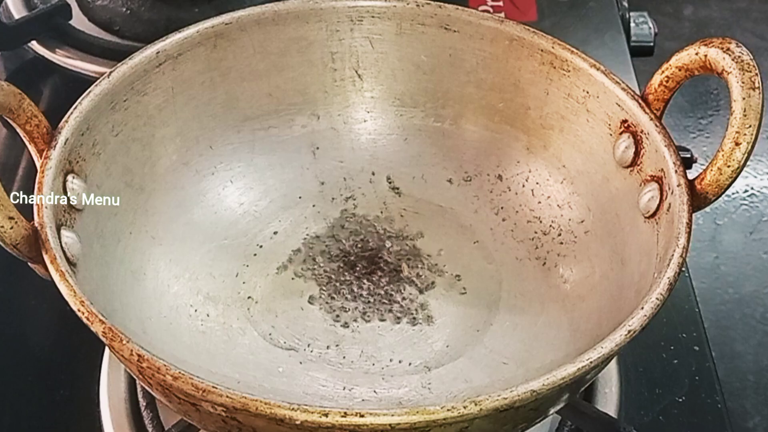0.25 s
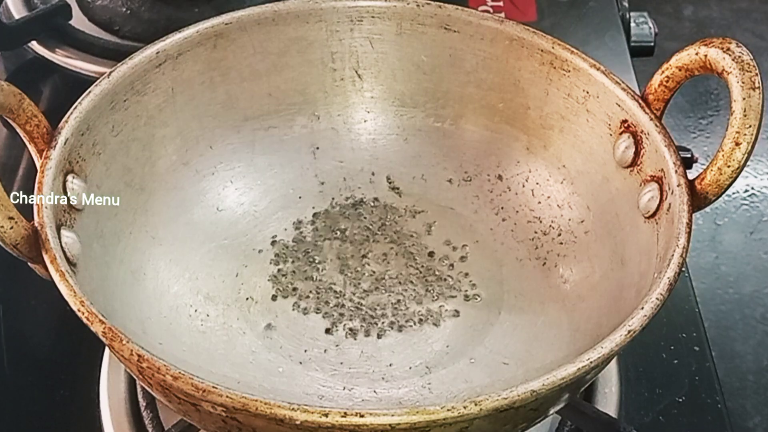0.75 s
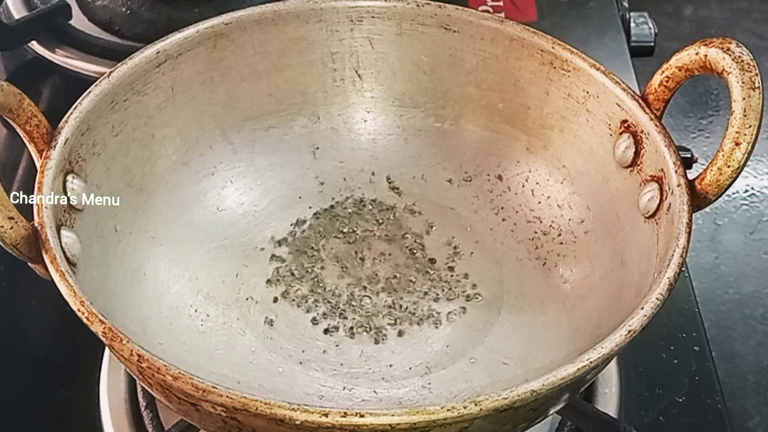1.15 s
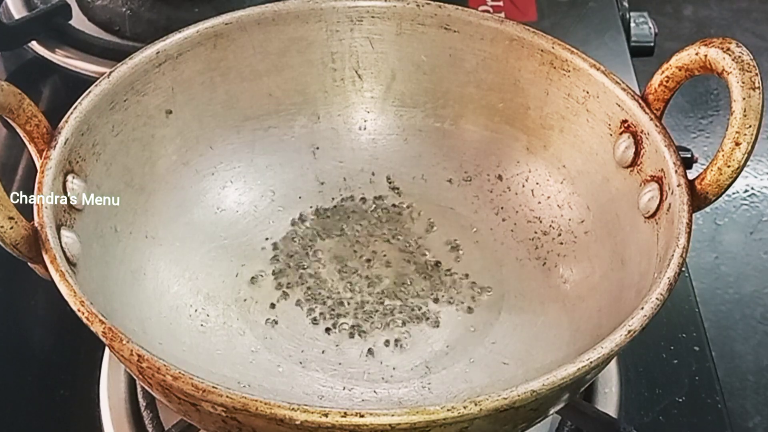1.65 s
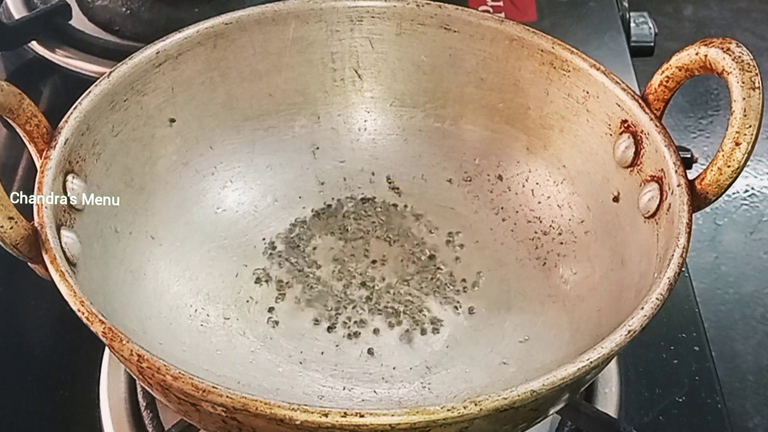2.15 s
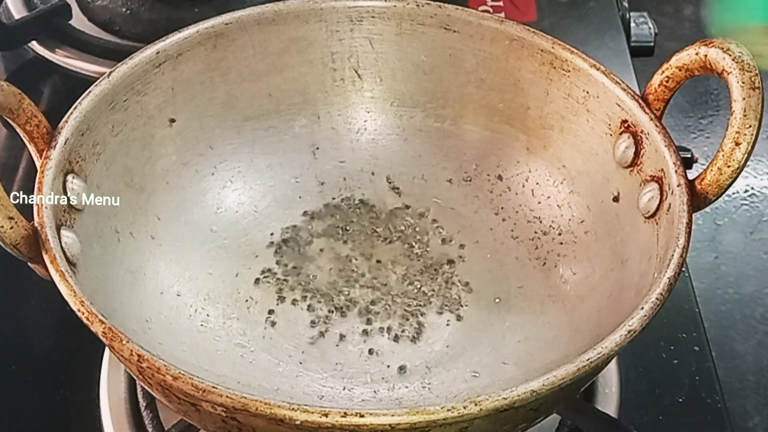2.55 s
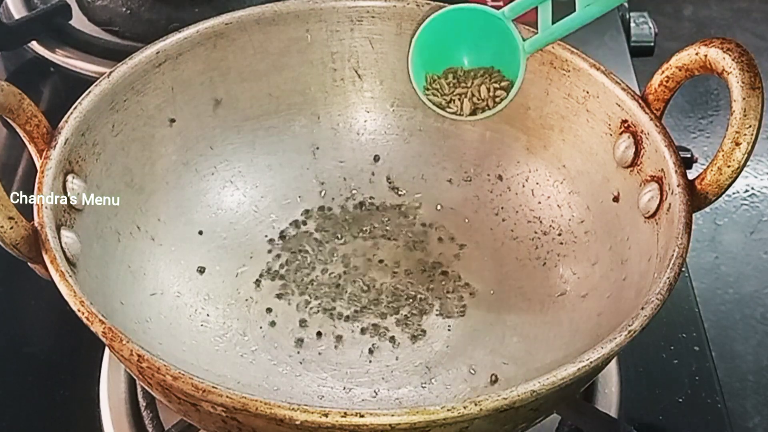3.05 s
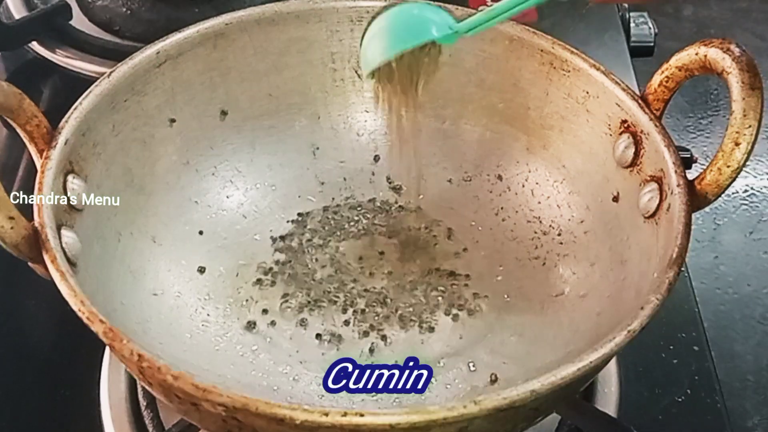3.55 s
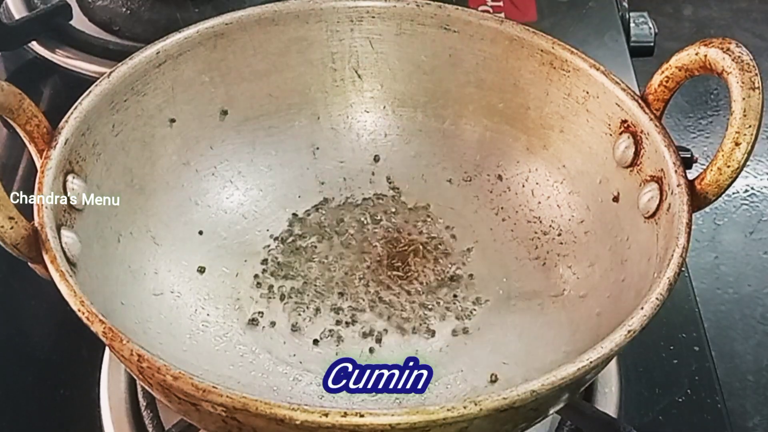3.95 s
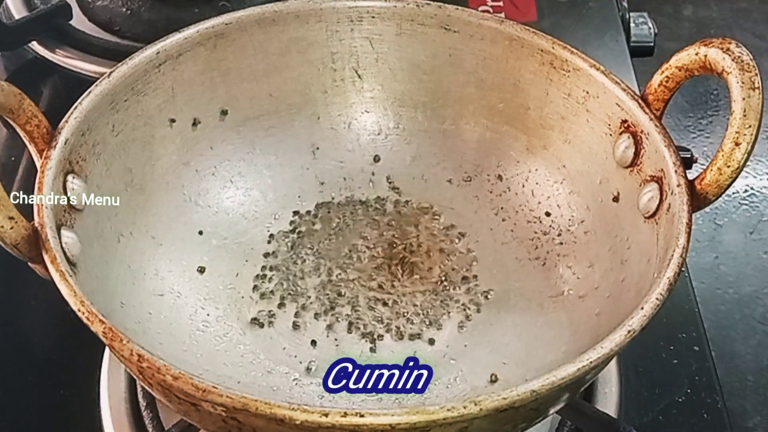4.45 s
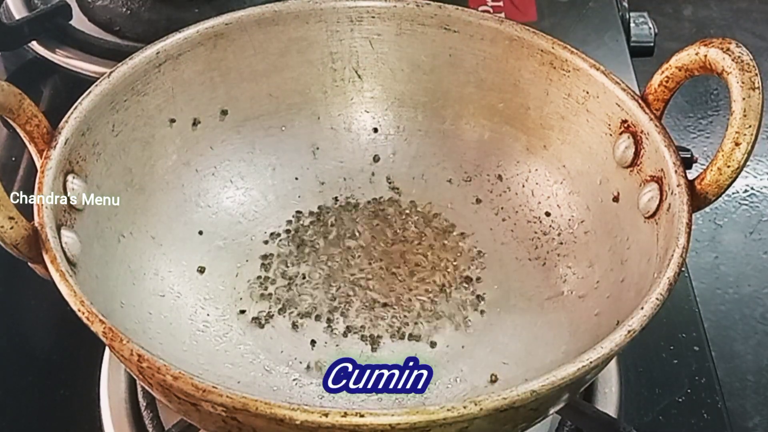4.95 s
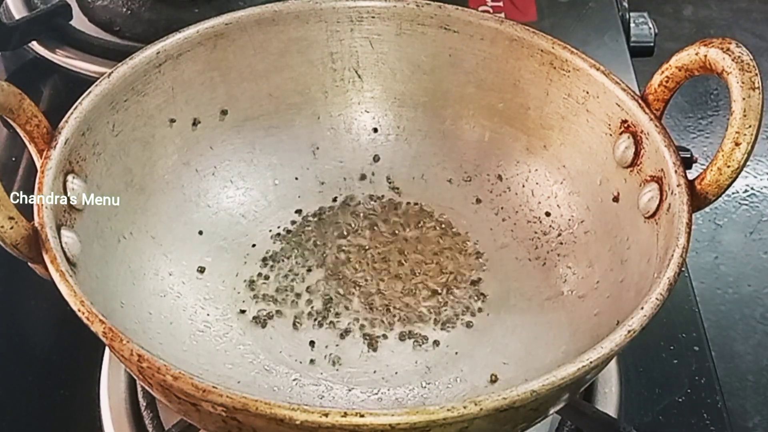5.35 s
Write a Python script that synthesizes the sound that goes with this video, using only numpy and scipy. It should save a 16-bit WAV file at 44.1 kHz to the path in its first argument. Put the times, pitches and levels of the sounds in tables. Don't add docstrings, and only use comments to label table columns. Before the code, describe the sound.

Close to a metal pan on a stove, mustard-like seeds burst in oil: isolated light ticks within the first second, frequent crisp cracks by two seconds, dense crackling after three. Brief steam hisses and dry spatter fill the gaps. A distant dish knock opens the scene and a few metallic knocks recur later. Small reflective kitchen, faint low hum, no speech.

```python
import sys
import numpy as np
from scipy import signal
from scipy.fft import rfft, irfft
from scipy.io import wavfile
from scipy.ndimage import uniform_filter1d

SR = 44100
rng = np.random.default_rng(int(sys.argv[2]) if len(sys.argv) > 2 else 0)


def voltage_ratio(decibels):
    exponent = np.asarray(decibels, float) / 20
    return 10 ** exponent


def pcm_store(signal):
    levels = np.round(np.clip(np.atleast_2d(signal), -1, 1) * 32767)
    wavfile.write(sys.argv[1], SR, levels.astype(np.int16).T)


N = 246519

# (pitch_hz, bright snap in dB against the peak)
DULL, LOW, MID, UPPER, HIGH = (2690, -0.5), (3780, -4), (5920, -4.5), (6780, -2.2), (9460, -2.8)
# (start_s, peak_db, body_db against peak, wash_db of steam and echo
# against peak, snap_db against its kind)
DULL_POPS = [
    (0.4826, -44, -1, -5.5, -20),
    (0.5707, -37.5, -28, -7, 10.5),
    (1.5548, -46.5, -6, -26, 18),
    (3.3823, -35, -9, -25, 0),
    (4.5779, -27.5, -12.5, -5, 3.5),
    (4.78, -39, 3.5, -9, 5),
    (5.4473, -20, -3.5, -18, -15),
]
LOW_POPS = [(0.2932, -37.5, -8.5, 1.5, -16), (1.1657, -19.5, -11, -11.5, 0), (1.277, -36, -6.5, -5.5, 0.5),
            (2.458, -25, -8.5, -12.5, -16), (2.6583, -26, -4.5, -22, -8), (2.9313, -25, -9, -2.5, -1.5),
            (3.04, -28, -7, -21.5, 3), (3.1562, -28, -16, -2.5, 1.5), (3.2491, -19, -40, -13, -2.5),
            (3.56, -21.5, -14.5, -9.5, -2), (3.7435, -22, -14, -10, -24), (3.7838, -23, -12, 1.5, -1),
            (4.2934, -22.5, -7, -11.5, -26), (4.4645, -28, -5, -16, 2), (4.5544, -16.5, -17, -17.5, -6),
            (4.809, -21.5, -9.5, -22, -10), (5.1773, -29.5, 0, -5, -4), (5.375, -28.5, -3.5, -10, -3)]
MID_POPS = [(1.5914, -22, -11.5, -18, 2), (1.881, -23.5, -16, -6.5, 1.5), (1.972, -21, -16.5, -9.5, -0.5),
            (2.117, -28, -44, -12, -1), (2.3246, -20, -13.5, -10.5, 0.5), (3.2767, -22.5, -7.5, -8, -1),
            (3.417, -27, -11.5, -5.5, -4), (3.678, -26, -12, -5, 2), (3.958, -25, -32, -4, -1),
            (4.0068, -20.5, -14.5, -13, -4), (4.0906, -20.5, -16, -11.5, -4), (4.1198, -24.5, -9.5, -6, -2),
            (4.65, -28.5, -19.5, -10, 5), (4.758, -40, -1, -3.5, 1), (4.772, -22, -16, -39, -4),
            (4.795, -25.5, -19, -2, 0.5), (4.838, -19, -14, -23, 0), (5.028, -22, -13, -11.5, -1.5),
            (5.539, -23.5, -21, -4.5, -5)]
UPPER_POPS = [(1.4656, -29, -11, -8.5, -2), (1.6511, -27, -6, -11.5, 3), (1.8317, -26.5, -14, -10.5, 1),
              (2.1938, -33.5, -2, -30, 4), (2.2881, -20, -17.5, -10.5, -1.5),
              (2.4263, -21.5, -10.5, -13.5, 0.5), (2.5903, -24.5, -8.5, -3.5, -5),
              (2.7914, -19, -18, -12, -0.5), (3.1446, -22, -22, -25, -3.5), (3.4437, -19.5, -14.5, -11, -7),
              (3.4978, -25.5, -13.5, -1.5, -2), (3.9065, -22.5, -6, -17, 1), (4.3406, -26, -17, -9, 0),
              (4.3719, -26.5, -9.5, -5.5, 0), (4.6299, -23, -54.5, -11, -2.5),
              (4.9375, -27.5, -6.5, -20, 2), (5.1672, -25, -12, -12, 3), (5.2436, -22, -11.5, -10.5, -0.5),
              (5.3825, -25.5, -13, -10, -1)]
HIGH_POPS = [(0.508, -32, -3, -24, -2), (0.728, -27, -10.5, -18.5, 2), (0.928, -21, -15.5, -7.5, -1),
             (1.076, -21.5, -13.5, -16, 0), (1.429, -20, -13.5, -15, 0.5), (1.4946, -22.5, -10, -16, 1.5),
             (2.1082, -27.5, -9, -9, 0), (2.1746, -22.5, -13.5, -7.5, 0), (2.355, -29.5, -35.5, -4, -3),
             (2.5681, -17, -12, -14, 2), (2.631, -18, -14.5, -12, -3), (2.6963, -25.5, -6, -14.5, 2),
             (2.7462, -28.5, -11, -11, 2.5), (3.0061, -20, -9.5, -14.5, -0.5),
             (3.0688, -31.5, -15.5, 2, -2), (3.2292, -25, -13.5, -7, -0.5), (3.316, -24, -8, -12.5, -2),
             (3.436, -24, -33, -23, -1), (3.6023, -28, -16, -10.5, -1), (3.694, -23, -33.5, -12.5, 4),
             (3.9656, -23, -12, -9.5, 0), (4.101, -22, -24, -25, 0), (4.1412, -15.5, -8.5, -16.5, -1),
             (4.164, -20.5, -31, -26, -2), (4.2353, -25.5, -13.5, -15, 0), (4.6948, -26, -13, -10, 3),
             (4.868, -28, -12, -5.5, 0), (4.9557, -19.5, -17, -11.5, -5), (5.1175, -26, -5, -13.5, 2.5),
             (5.4882, -18, -18.5, -10, -3)]
# (start_s, peak_db)
LOW_TICKS = [(1.548, -30), (1.7639, -40), (2.399, -49.5), (2.61, -28.5), (2.409, -40), (3.1386, -33.5),
             (3.4256, -31), (3.8008, -18.5), (3.8355, -29.5), (3.8477, -25), (3.898, -27.5), (3.9369, -31),
             (4.39, -49.5), (4.6223, -30.5), (4.846, -25.5), (5.3398, -38.5), (5.4432, -26), (5.4636, -31)]
MID_TICKS = [(0.277, -41), (0.554, -41), (1.5365, -40.5), (1.844, -34), (2.597, -28), (2.8523, -33.5),
             (2.861, -38), (2.9755, -31.5), (2.989, -35), (3.1502, -25.5), (3.3274, -25), (3.496, -29),
             (3.5208, -21), (3.6273, -31), (3.807, -28), (4.285, -30), (4.3509, -27), (4.3042, -25.5),
             (5.005, -29.5), (5.2774, -32.5)]
HIGH_TICKS = [(0.7364, -32.5), (0.893, -40), (0.913, -44), (1.0682, -29), (1.562, -31.5), (1.6732, -24.5),
              (1.8762, -25.5), (2.205, -32), (2.219, -24), (2.248, -29), (2.4856, -36), (2.5185, -27),
              (2.5335, -24.5), (2.5405, -45), (2.601, -27), (3.0418, -23.5), (3.3795, -28.5),
              (3.455, -24.5), (3.7547, -23), (4.0169, -19.5), (4.183, -25), (4.2424, -37), (4.3265, -24),
              (5.0586, -29), (5.1538, -37), (5.251, -45), (5.2953, -26), (5.4082, -27.5), (5.5126, -24.5),
              (5.53, -27)]
TICK_BODY_DB, TICK_WASH_DB = -17.5, -14.5


def bursts():
    rows = []
    pop_kinds = [(DULL, DULL_POPS), (LOW, LOW_POPS), (MID, MID_POPS), (UPPER, UPPER_POPS), (HIGH, HIGH_POPS)]
    for (hz, snap_db), pops in pop_kinds:
        for s, db, body_db, wash_db, *own_db in pops:
            rows.append((s, db, hz, body_db, snap_db + sum(own_db), wash_db))
    for (hz, snap_db), ticks in [(LOW, LOW_TICKS), (MID, MID_TICKS), (HIGH, HIGH_TICKS)]:
        rows += [(s, db, hz, TICK_BODY_DB, snap_db, TICK_WASH_DB) for s, db in ticks]
    return np.transpose(rows)


RING_STRAY = 0.02
STRONG_SNAP_DB = -27
BOWL_ECHO_S, BOWL_ECHO_DB = 0.0075, -12


def cracks(seeds, ring_cycles=24.0, split_t60=0.0015, bowl_t60=0.023, bowl_db=-8.5, spit_db=0.0):
    s, db, hz, body_db, snap_db, wash_db = seeds[:, :, None]
    hz = hz * (1 + RING_STRAY * rng.standard_normal(hz.shape))
    size = 1200
    t, out = np.arange(size) / SR, np.zeros(N + size)
    noise = rng.standard_normal((len(s), size))
    spit = noise * (voltage_ratio(-60 * t / split_t60) + voltage_ratio(bowl_db - 60 * t / bowl_t60))
    spit[:, 0] += 2.5
    ring = np.sin(2 * np.pi * hz * t) * voltage_ratio(-60 * t * np.maximum(hz, 4000) / ring_cycles)
    body = band(spit, 986.0, 3510.0)
    snap = voltage_ratio(0.5) * band(spit, 9740, 13336) + voltage_ratio(-0.5) * band(spit, 13800, 21500)
    shapes = peak_one(ring)
    shapes += voltage_ratio(spit_db) * peak_one(band(spit, 2855.0, 7800.0))
    shapes += voltage_ratio(body_db + 4.0) * peak_one(body)
    shapes += voltage_ratio(snap_db + 8.5) * peak_one(snap)
    shapes = np.where(db + snap_db > STRONG_SNAP_DB, shapes, steady_cut(shapes))
    shapes = signal.sosfilt(signal.butter(3, 800, "high", fs=SR, output="sos"), shapes)
    for i, shape in zip((s[:, 0] * SR).astype(int), voltage_ratio(db) * shapes):
        out[i:i + size] += shape
    lag = int(BOWL_ECHO_S * SR)
    echo = np.concatenate([np.zeros(lag), band(out, 850, 10380)[:N - lag]])
    return out[:N] + voltage_ratio(BOWL_ECHO_DB) * echo


# (pitch_hz, width_hz, level_db)
BOWL = [
    (699.6, 15, 5),
    (1148, 11, -13),
    (1866, 73, -4),
    (2870, 86, -1.5),
    (3493, 80, -5.5),
    (5900, 124, -7),
    (9560, 250, -7),
]


def bowl(x):
    return x + sum(voltage_ratio(db) * resonance(x, hz, width_hz) for hz, width_hz, db in BOWL)


# (pitch_hz, t60_s to fall by 60 dB)
KITCHEN = [(1000, 0.32), (4000, 0.42), (12000, 0.32)]
GRIT_SIGMA, GRIT_DB = 2.6, 12


def wash(follow=0.85):
    s, db, ring_hz, body_db, snap_db, wash_db = bursts()
    white, out = rng.standard_normal((2, N)), 0
    grit = np.sign(white) * np.maximum(np.abs(white) - GRIT_SIGMA, 0)
    white = rms_one(white + voltage_ratio(GRIT_DB) * grit)
    edges = 500 * 2 ** np.arange(0, 5.3, .5)
    for k, (low, high) in enumerate(zip(edges, edges[1:])):
        hz = np.sqrt(low * high)
        tint = np.interp(np.log(hz), np.log([1800, 3500]), [1, 0]) * (body_db - np.mean(body_db))
        tint += np.interp(np.log(hz), np.log([6000, 10000]), [0, 1]) * (snap_db - np.mean(snap_db))
        near = 4.13 * np.exp(-(np.log(hz / ring_hz) / 0.5) ** 2)
        level_db = db + np.minimum(wash_db, 3.0) - 5.0 + follow * tint + near
        out = out + band(white[k % 2], low, high) * dying(s, level_db, at_hz(KITCHEN, hz), 0.0002955)
    return out


# (start_s, peak_db, pitch_hz)
SPATTER = [(0.294, -32, 4830), (0.4962, -50, 1847), (0.5004, -49, 4928), (0.5745, -40, 9640),
           (0.8639, -55.5, 4606), (0.9025, -42, 10300), (1.0108, -47, 6110), (1.0716, -37, 5610),
           (1.333, -47, 9834), (1.52, -31, 10730), (1.5435, -44, 4674), (1.577, -33.5, 9550),
           (1.7615, -43.5, 2229), (1.779, -43, 3423), (1.7978, -42, 5698), (1.8553, -42, 5866),
           (2.2013, -39.5, 10310), (2.2048, -42, 9610), (2.3549, -28, 8774), (2.3628, -32.5, 6855),
           (2.3993, -34, 4690), (2.5262, -35.5, 9520), (2.5607, -51, 5920), (2.5652, -42, 10160),
           (2.724, -36, 6765), (2.9044, -50, 6250), (3.02, -27, 4830), (3.4845, -32, 6200),
           (3.5177, -28, 9587), (3.556, -30.5, 9800), (3.674, -31, 3463), (3.7949, -30.5, 4013),
           (3.8094, -20, 5904), (3.976, -28, 5890), (3.9979, -32, 5848), (4.2044, -28, 10100),
           (4.3898, -28.5, 5575), (4.758, -26, 9614), (4.8672, -32.5, 9260), (5.0233, -32, 4350),
           (5.0587, -32, 10590), (5.1038, -42, 6706), (5.1313, -35, 10460), (5.2713, -32.5, 3662),
           (5.3198, -40.5, 6796), (3.7437, -22.5, 5860), (3.7883, -28, 10200), (3.801, -27, 5900),
           (3.9068, -25, 2650), (3.9068, -33, 9300), (4.5548, -24.5, 6000), (4.846, -33, 5500),
           (5.2773, -32, 2290), (5.4642, -28, 2600), (5.539, -33, 4970), (0.68, -49, 1700),
           (3.23, -31, 11500), (3.4848, -33, 11500), (5.0594, -28, 11000), (3.3823, -31, 4600)]
# (start_s, peak_db)
HUSKS = [(0.927, -33), (1.1656, -39), (1.428, -30), (1.5532, -34), (1.8311, -35), (1.88, -28),
         (2.4257, -34), (2.5676, -32), (2.9336, -34), (3.4165, -26), (3.6774, -30), (3.9648, -27),
         (4.302, -29), (4.6946, -33), (4.8662, -32), (5.1166, -35), (5.4873, -37)]
HUSK_HZ = 14900
SPATTER_BODY_DB, SPATTER_SNAP_DB = -15.5, -13


def spatter():
    s, db, hz = np.transpose(SPATTER + [(s, db, HUSK_HZ) for s, db in HUSKS])
    seeds = np.array([s, db, hz, 0 * s + SPATTER_BODY_DB, 0 * s + SPATTER_SNAP_DB, 0 * s])
    return cracks(seeds, spit_db=-5.0)


def fizz(level_db, per_s=2500.0, spread_db=4.0, patchy_db=1.5):
    sizes = voltage_ratio(spread_db * np.minimum(rng.exponential(1, N), 5)) * rng.choice([-1, 1], N)
    grains = sizes * (rng.random(N) < per_s / SR)
    hiss = rms_one(grains) + 1.97 * rng.standard_normal(N)
    edges = [500, 1100, 2400, 5000, 8000, 12000, 18000]
    patches = sum(band(hiss, low, high) * voltage_ratio(patchy_db * drift(19.0)) for low, high in zip(edges, edges[1:]))
    return voltage_ratio(level_db) * rms_one(patches)


# (start_s, level_db)
OIL = [(0.0, -60), (0.3, -63), (0.45, -60), (0.65, -53), (0.82, -56.5), (0.95, -51.5), (1.35, -64),
       (1.6, -42.5), (2.2, -68), (2.8, -65), (3.5, -54), (4.3, -49), (5.59, -53)]


def oil_fizz():
    return fizz(np.interp(np.arange(N) / SR, *np.transpose(OIL)))


# (start_s, level_db, length_s)
JETS = [(0.332, -50, 0.04726), (0.416, -50, 0.099), (0.584, -38.5, 0.051), (1.582, -36.5, 0.064),
        (1.99, -36, 0.03385), (2.63, -44, 0.0699), (3.794, -45, 0.072), (4.197, -40.5, 0.12),
        (4.379, -52, 0.0526), (4.577, -36, 0.02706), (4.715, -42.5, 0.0378), (5.053, -45.5, 0.043),
        (5.505, -36, 0.081)]
JET_T60_S, JET_RISE_S, JET_LOW_HZ = 0.32, 0.01, 2473


def jets():
    t, power = np.arange(N) / SR, 1e-20
    for s, db, length_s in JETS:
        swell = 1 - np.exp(-np.maximum(t - s, 0) / JET_RISE_S)
        release_db = -60 * np.clip(t - s - length_s, 0, 2) / JET_T60_S
        power = power + (swell * voltage_ratio(db + release_db)) ** 2
    high_pass = signal.butter(2, JET_LOW_HZ, "high", fs=SR, output="sos")
    return signal.sosfilt(high_pass, fizz(10 * np.log10(power)))


# (pitch_hz, level_db per Hz)
MIC = [(240, -42.5), (400, -12.5), (781, -12.5), (1030, -1), (1310, -9.5), (1960, -4), (2290, -4.5),
       (3590, -2.5), (4130, -1.5), (5820, 2.5), (8060, -3), (9570, 1.5), (13500, -12), (15000, 4),
       (16500, 7)]


def through_microphone(x):
    gain = np.sqrt(np.mean(voltage_ratio(2 * at_hz(MIC, np.arange(10, SR / 2)))))
    return colour(x, MIC) / gain


# (start_s, push_db, fall-back in ms)
THUMPS = [
    (0.5697, -7.5, 0.89),
    (1.5548, -12.5, 0.95),
    (1.6507, -11, 0.075),
    (1.88, -9, 0.11),
    (2.5684, -16, 0.14),
    (2.697, -17.5, 0.13),
    (4.164, -6, 0.0454),
    (4.5782, -9.5, 0.15),
    (5.488, -20, 1.65),
]
PUSH_SIGN = [-1, -1, 1, 1, 1, 1, 1, 1, 1]
MIC_LOW_HZ, MIC_LOW_DAMP = 86.86, 0.46


def thumps():
    t, out = np.arange(2000) / SR, np.zeros(N + 2000)
    for (s, push_db, fall_ms), sign in zip(THUMPS, PUSH_SIGN):
        step = np.exp(-t * 1000 / max(fall_ms, .05)) * (1 - np.exp(-t / .00005)) ** 2
        i = int(s * SR)
        out[i:i + len(t)] += sign * voltage_ratio(push_db) * step
    w = 2 * np.pi * MIC_LOW_HZ
    b, a = signal.bilinear([1, 0, 0], [1, 2 * w * MIC_LOW_DAMP, w ** 2], SR)
    return signal.lfilter(b, a, out)[:N]


# (start_s, level_db, t60_s to fall by
# 60 dB)
KNOCKS = [(0.1175, -26, 0.39), (0.154, -47.5, 0.63), (0.347, -57.5, 0.5), (2.178, -57, 0.64),
          (3.0, -60, 0.5282), (3.16, -54.5, 0.2), (3.25, -43.5, 0.65), (3.299, -60, 0.4),
          (4.207, -52.5, 0.4893), (4.804, -51.5, 0.6864), (5.175, -37.5, 0.5), (0.606, -58, 0.2),
          (1.427, -58.5, 0.7), (2.79, -71, 0.7), (3.67, -66, 0.9854), (3.9, -75, 0.4)]
# (pitch_hz, width_hz, level_db)
KNOCK_TONES = [
    [(850, 20, -17.5), (970, 25, -18.5), (1404, 220, -6), (1530, 120, -6), (1750, 250, -17),
     (2130, 99, -12.5), (2360, 230, -3.5), (2834, 110, -12), (2850, 18, -13.5), (3670, 880, -8.5),
     (4800, 1800, -6.5), (6640, 360, -12.5), (7300, 1500, -19.5)],
    [(264, 120, 0)],
    [(280, 147.2, 0)],
    [(316.4, 620, 0.0002)],
    [(220, 43, 0)],
    [(2810, 58, 0.0045)],
    [(2807, 74, 0)],
    [(240.94, 200, 0)],
    [(270, 60, -1.37), (545, 640, -1.688)],
    [(750, 45, 1.914), (243, 44.18, -2.1)],
    [(1161, 75.95, -3), (931.1, 73.4, -15), (2559.5, 1187, -2.5), (231, 35, -18.5)],
    [(800, 810, 0)],
    [(456.7, 610, 0)],
    [(209.7, 40, 0.00025)],
    [(224.87, 24, 0)],
    [(209.8, 53.7, 0)],
]


def knocks():
    out = np.zeros(N)
    for (s, db, t60), tones in zip(KNOCKS, KNOCK_TONES):
        envelope = dying([s], np.array([db]), t60, 0.0002036) + dying([s], np.array([db - 6.0]), 0.042, 0.00062)
        echo = rng.standard_normal(N) * envelope
        echo += strikes([s], voltage_ratio(db + 17.0))
        for k, (hz, width_hz, tone_db) in enumerate(tones):
            level = (-1) ** k * voltage_ratio(tone_db) * np.sqrt(SR / width_hz / 4)
            out += level * resonance(echo, hz, width_hz)
    return signal.sosfilt(signal.butter(2, 9500, fs=SR, output="sos"), out)


# (start_s,
# pitch_hz, level_db, t60_s, rise_s)
RINGS = [(0.1176, 1444, -34, 0.4, 0.0031), (0.1178, 1486, -28.5, 0.37, 0.0065),
         (0.1176, 1560, -31, 0.32, 0.00592), (0.1176, 1617, -35, 0.3267, 0.002986),
         (0.1176, 2230, -34, 0.1967, 0.0026), (0.117, 2365, -41, 0.323, 0.00396),
         (0.1176, 2272, -37, .25, .004), (0.1176, 6470, -40, .1, .002), (0.118, 2440, -42, 0.289, .004),
         (0.1176, 2650, -43, 0.3207, .004), (0.1176, 5100, -40, 0.31, .003),
         (0.84, 702, -61.5, 0.4166, 0.02026), (1.276, 714, -58, 0.1774, 0.00522),
         (1.762, 706, -53, 0.1216, 0.00463), (3.158, 2860, -48, 0.4176, 0.0123),
         (3.25, 2870, -34, 0.087, 0.001636), (4.81, 705, -35, 0.13, 0.00722),
         (4.88, 716, -56.5, 0.43, 0.01867), (5.177, 1137, -30.5, 0.12, 0.00396),
         (5.235, 1133, -41, 0.27, 0.02), (0.482, 2014, -46, 0.02694, 0.00044),
         (0.728, 1750, -46, 0.02623, 0.00059), (0.925, 360.2, -49.5, 0.029, 0.000823),
         (3.35, 204, -57, 0.32, 0.01653), (3.379, 1860, -37.5, 0.02, 0.000492),
         (3.8472, 1870, -27.5, 0.014, 0.000484), (4.465, 1720, -39, 0.02131, 0.000694),
         (4.779, 1010, -28, 0.016, 0.000752), (4.779, 670, -37, 0.031, 0.00061)]


def rings():
    t, out = np.arange(SR // 2) / SR, np.zeros(N + SR)
    for s, hz, db, t60, rise_s in RINGS:
        i = int(s * SR)
        envelope = voltage_ratio(db - 60 * t / t60) * (1 - np.exp(-t / rise_s))
        out[i:i + len(t)] += envelope * np.sin(2 * np.pi * hz * t)
    return out[:N]


# (start_s, level_db)
FAN = [(0.0, -54.5), (0.35, -60), (0.7, -56), (1.1, -59), (1.35, -62), (1.75, -62), (1.92, -74),
       (2.05, -61.5), (2.35, -64), (2.75, -65.5), (2.95, -76.5), (3.25, -68.5), (3.52, -70.5), (3.6, -62),
       (3.75, -66.5), (4.1, -63), (4.3, -76), (4.45, -68), (4.75, -71.5), (5.1, -67.5), (5.59, -64.5)]
# (pitch_hz, level_db per Hz)
QUIET = [(18, -85), (30, -13), (48, -6.5), (135, 12), (327, -13.5), (477, -23.5), (695, -14), (779, -41),
         (1010, -17), (1500, -30), (1950, -37.5), (3300, -120)]


def fan():
    level_db = np.interp(np.arange(N) / SR, *np.transpose(FAN))
    hum = rms_one(resonance(resonance(rng.standard_normal(N), 133.0, 9.268), 147.4, 43.0))
    hum = rms_one(hum / np.sqrt(1.2 + np.abs(uniform_filter1d(hum ** 2, size=3000))))
    air = rms_one(colour(rng.standard_normal(N), QUIET))
    low, high = band(air, 20, 200), band(air, 200, 2500)
    air = low * voltage_ratio(2.0 * drift(4.0)) + high * voltage_ratio(3.0 * drift(5.0))
    return voltage_ratio(level_db) * hum + voltage_ratio(uniform_filter1d(level_db, size=SR) - 0.5) * air


def rms_one(x):
    return x / np.sqrt(np.mean(x ** 2) + 1e-20)


def peak_one(rows):
    return rows / np.abs(rows).max(axis=1, keepdims=True)


def at_hz(points, hz):
    table = np.array(points)
    return np.interp(np.log(hz), np.log(table[:, 0]), table[:, 1])


def colour(x, points, size=8192):
    hz = np.maximum(np.arange(size // 2 + 1) * SR / size, 1)
    cep = irfft(np.log(voltage_ratio(at_hz(points, hz))))
    cep[1:size // 2] *= 2
    cep[size // 2 + 1:] = 0
    return signal.fftconvolve(x, irfft(np.exp(rfft(cep))))[:N]


def band(x, low_hz, high_hz):
    return signal.sosfilt(signal.butter(2, [low_hz, high_hz], "band", fs=SR, output="sos"), x)


def steady_cut(x):
    return signal.sosfilt(signal.cheby2(12, 45, 15750, fs=SR, output="sos"), x)


def resonance(x, hz, width_hz):
    r = np.exp(-np.pi * width_hz / SR)
    b = np.array([1, 0, -1]) * (1 - r * r) / 2
    return signal.lfilter(b, [1, -2 * r * np.cos(2 * np.pi * hz / SR), r * r], x)


def strikes(s, heights):
    out = np.full(N, 1e-18)
    np.add.at(out, np.minimum((np.asarray(s) * SR).astype(int), N - 1), heights)
    return out


def dying(s, db, t60, rise_s):
    r, q = voltage_ratio(-120 / (t60 * SR)), np.exp(-1 / (rise_s * SR))
    decay = signal.lfilter([1], [1, -r], strikes(s, voltage_ratio(2 * db)))
    return np.sqrt(signal.lfilter([1 - q], [1, -q], decay))


def drift(rate):
    r = np.exp(-80 * np.pi * rate / SR)
    slow = signal.lfilter([1], [1, -2 * r, r * r], rng.standard_normal(N // 40 + 2002))[2000:]
    return np.interp(np.arange(N) / 40, np.arange(len(slow)), rms_one(slow))


def scene():
    oil = through_microphone(wash() + oil_fizz() + jets())
    pan = bowl(cracks(bursts()) + steady_cut(oil)) + thumps()
    return (pan + spatter() + knocks() + rings() + fan())[None]


# (pitch_hz, level_db per cell)
DUCK = [(300, -120), (900, -95), (2000, -97.5), (4000, -112)]


def suppress(x, size=1024):
    hz, _, cells = signal.stft(x, SR, nperseg=size)
    power = uniform_filter1d(uniform_filter1d(np.abs(cells) ** 2, size=5, axis=1), size=3, axis=2)
    noise = voltage_ratio(2 * at_hz(DUCK, np.maximum(hz, 1)))[:, None]
    return signal.istft(cells * power / (power + noise), SR, nperseg=size)[1][:, :N]


def band_limit(x):
    return signal.sosfilt(signal.butter(12, 16800, fs=SR, output="sos"), x)


def record(dry):
    mix = signal.sosfilt(signal.cheby2(10, 60, 16900, fs=SR, output="sos"), suppress(dry))
    return band_limit(mix)


dry = scene()
out = record(dry)
pcm_store(out)
```